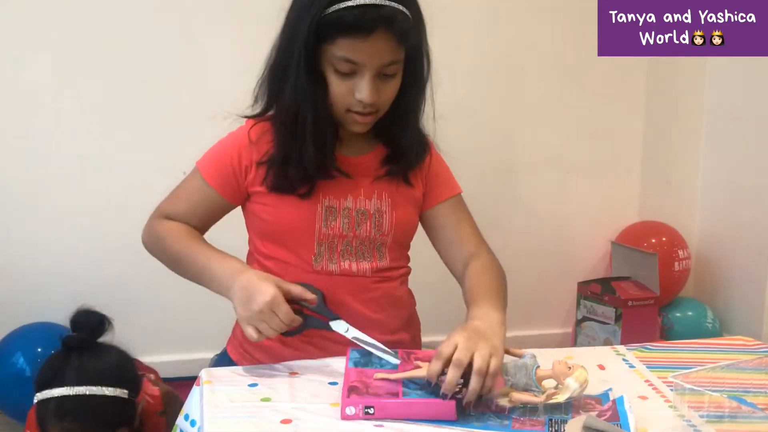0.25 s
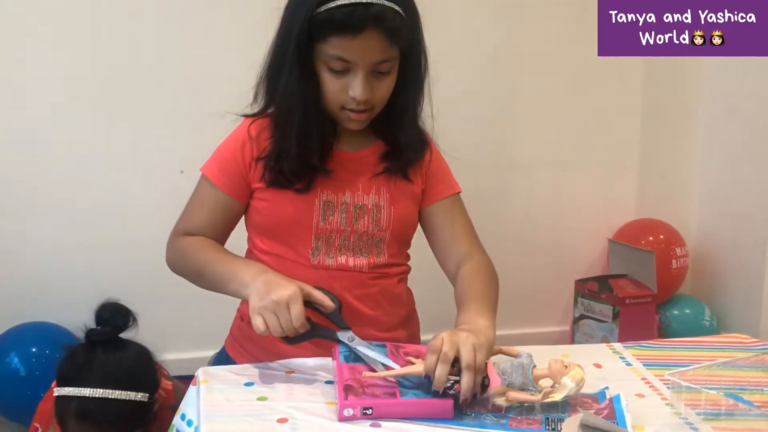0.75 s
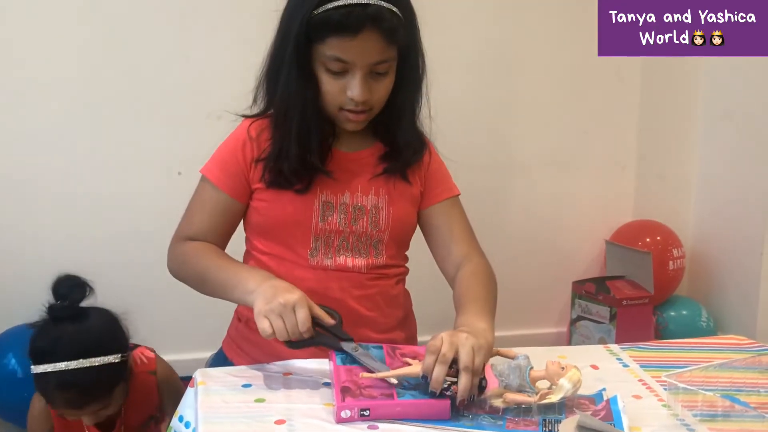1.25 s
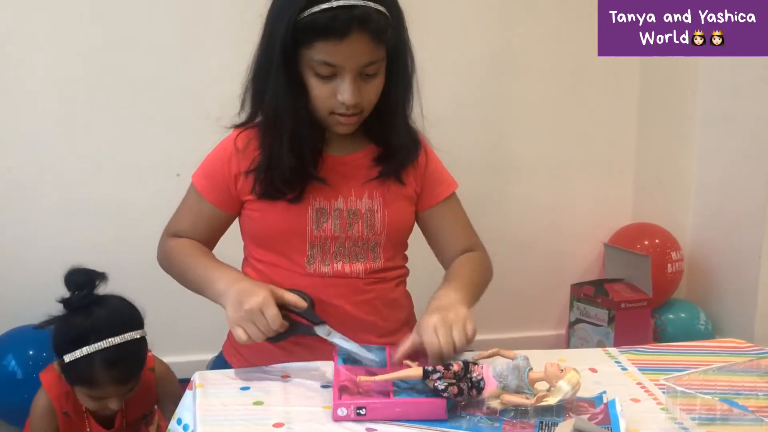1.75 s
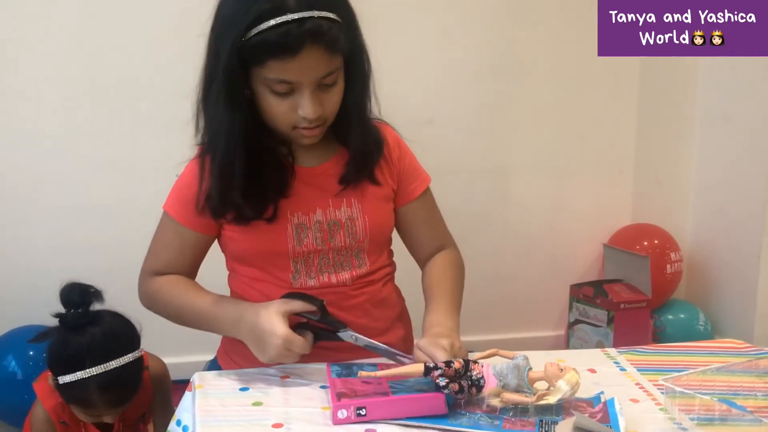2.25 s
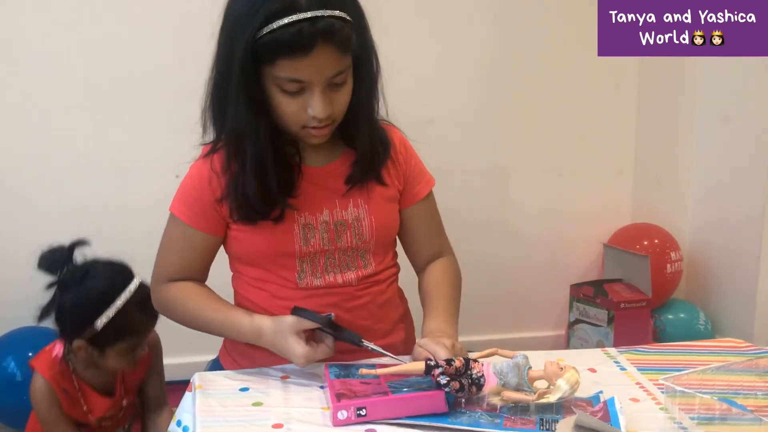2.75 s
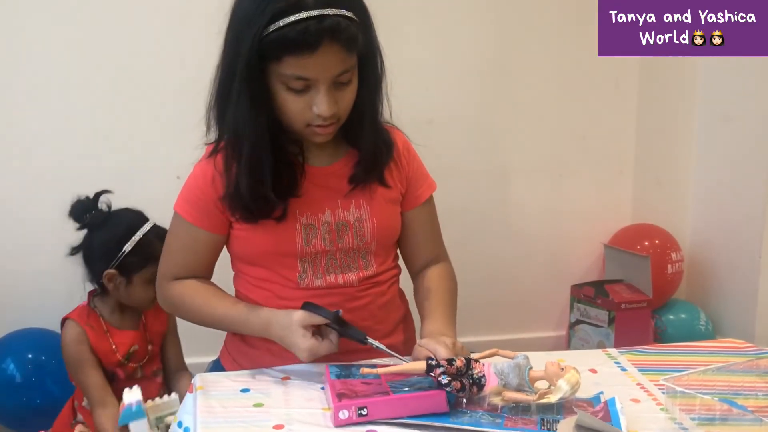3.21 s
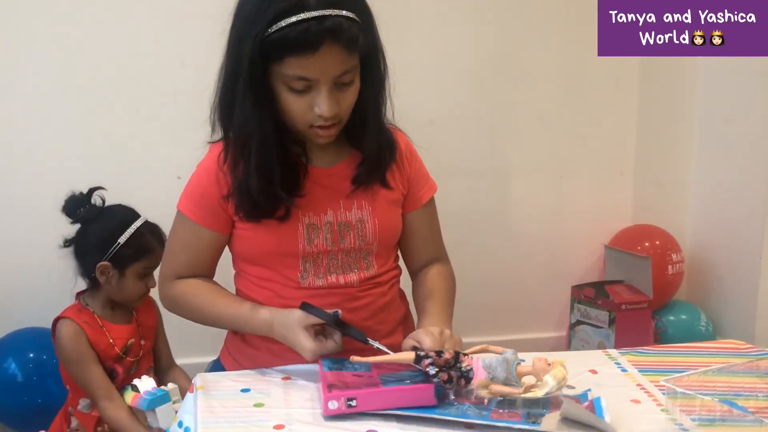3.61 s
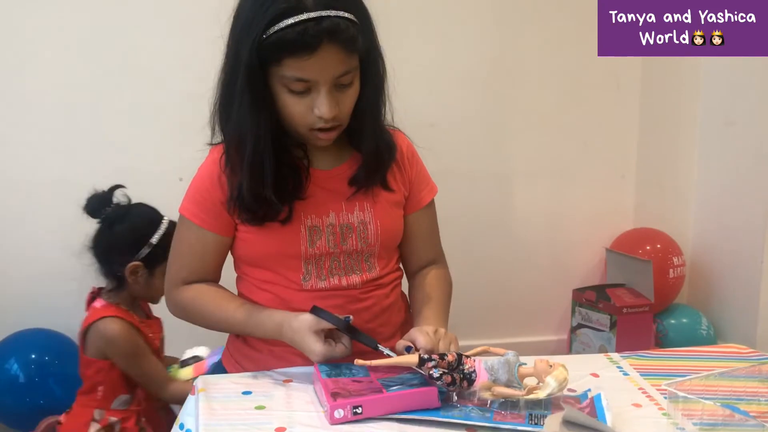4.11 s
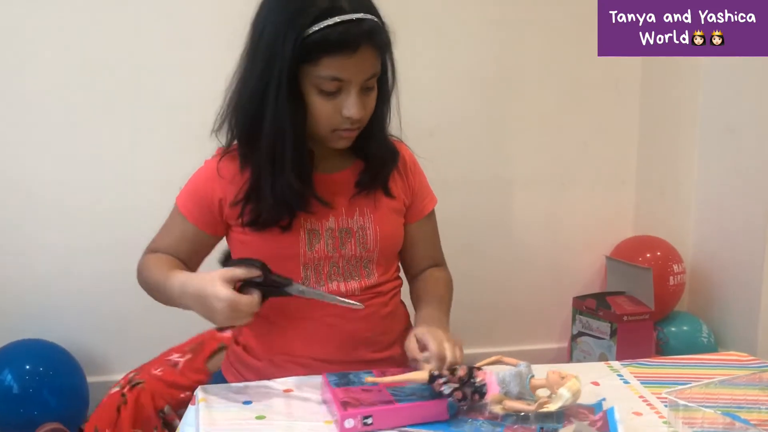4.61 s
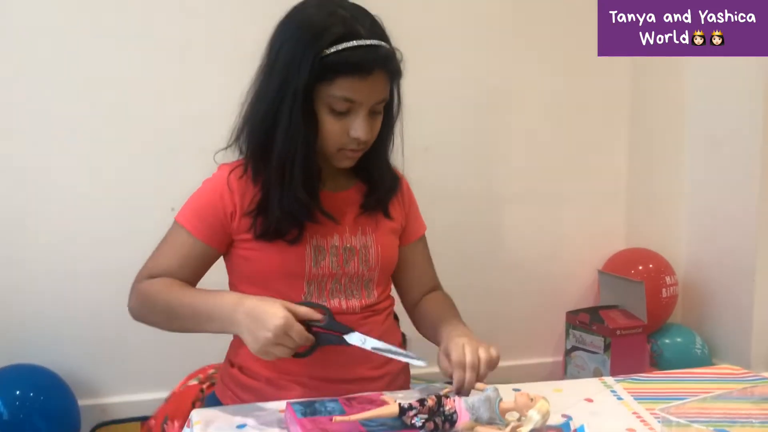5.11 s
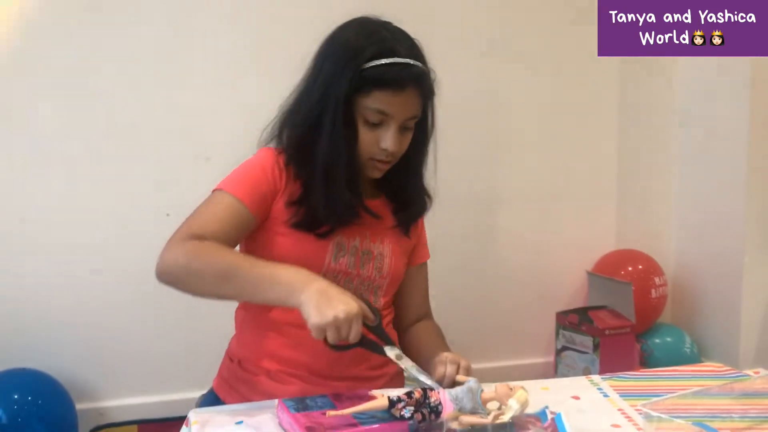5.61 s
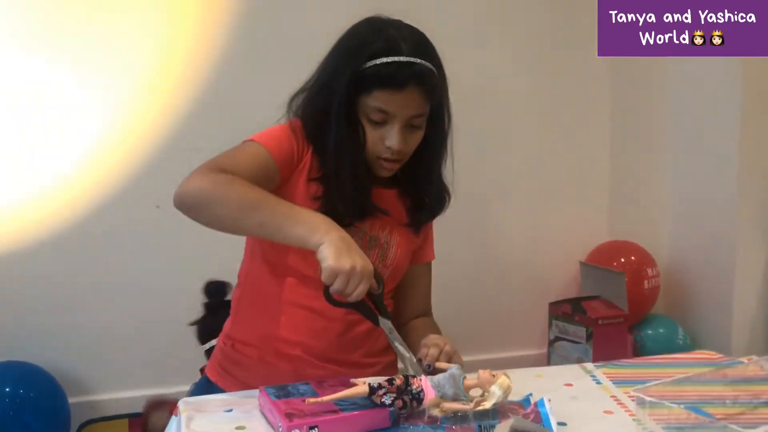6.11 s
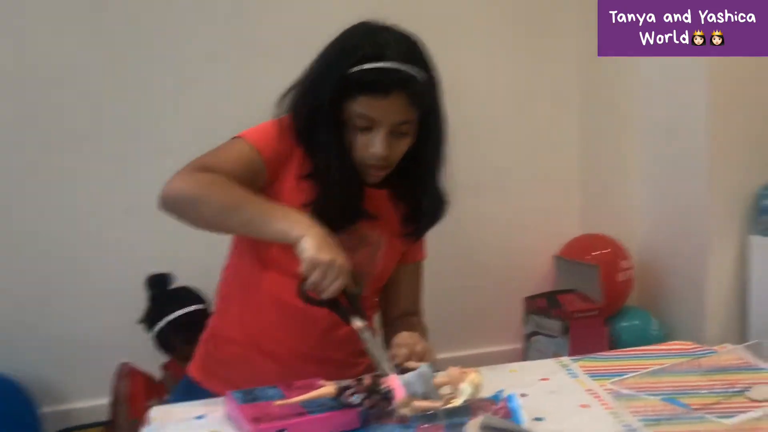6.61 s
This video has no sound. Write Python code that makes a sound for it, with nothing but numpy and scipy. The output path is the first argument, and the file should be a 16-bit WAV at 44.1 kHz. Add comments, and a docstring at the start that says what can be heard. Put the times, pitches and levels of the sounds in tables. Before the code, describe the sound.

Scissors snip at stiff toy packaging with sharp plastic snaps and card rustle, knocks and floor thumps nearby, faint fan hum in a small room.

```python
"""A small bare room: scissors work at the plastic ties of a toy box on a table, a fan humming behind.
Far: steady shaped noise for the air, noise through low resonances for the drone.
Near: card and film rustle and strokes are slipping grains; scrapes and blades ring hard resonances;
thumps on the floor are dying sines; ticks, snapping ties and knocking bricks are noise bursts.
Sparse tails carry the close sounds into the room; the microphone cuts bass and colours the treble."""
import sys
import numpy as np
from scipy import signal
from scipy.io import wavfile
from scipy.ndimage import uniform_filter1d

SR = 44100
rng = np.random.default_rng(int(sys.argv[2]) if len(sys.argv) > 2 else 0)


def int16_out(signal):
    """Quantize to a 16-bit WAV file."""
    q = np.round(np.clip(np.atleast_2d(signal).T, -1, 1) * 32767)
    wavfile.write(sys.argv[1], SR, q.astype(np.int16))


N = 302380

# Air of the room, relative spectrum: f/Hz, density/dB per Hz
AIR_SPECTRUM = [(18, -44), (30, 20.5), (100, -7), (121, -49), (149, -10), (259, -8.5), (740, -28),
                (889, -12), (1460, -66), (1670, -41), (2120, -61), (6050, -33), (10500, -35), (12600, -30),
                (16000, -30)]
AIR_DB, HUM_DB, WAVER_DB = -55, -58.5, 1  # rms level of the air, mid level and rms waver of the fan drone

# Decay of the room: f/Hz, t60/s
ROOM_DECAY = [(250, 0.35), (700, 0.48), (1800, 0.37), (4600, 0.44), (12000, 0.24)]

# Knees and other soft blows on the floor: t/s, blow level/dB, factor on pitch, slap re blow/dB
THUMPS = [(.146, -30, 1.34, -1.5), (0.518, -34, 0.59, -30), (1.301, -36.5, 1.57, -15),
          (2.42, -44.5, 1.8, -31), (3.96, -30.5, 1.5, 3.5), (4.041, -31.5, 1.0, -2),
          (4.142, -19, 0.86, -7.5), (4.165, -22.5, 1.16, -4), (4.191, -26, 1.03, -5),
          (4.664, -9, 1.0, -12.5), (4.698, -25.5, 1.16, -10.5), (4.744, -30, 0.91, -18),
          (5.228, -22, 0.94, -14), (5.879, -35.5, 1.36, -18)]
# Floor boards, before the factor on pitch and the tilt: f/Hz, level/dB, t60/s
FLOOR_MODES = [(69.3, -5, 0.33), (108.4, 4, 0.15), (187.2, -8, 0.36), (253.2, -14, 0.42),
               (292.5, -4.5, 0.15), (373.6, -13, 0.23)]
FLOOR_TILT_DB_PER_OCTAVE = -2.5  # pivots at 100 Hz

# Handling of card and film: t/s, level/dB, brightness/dB per octave
RUSTLE = [(0.05, -56, 3), (0.13, -45, 2), (0.4, -56.5, 0.5), (0.55, -43.5, 2), (0.65, -58, -1),
          (1.18, -64, 0.5), (1.32, -44.5, 4), (1.45, -54.5, 1.5), (1.79, -50.5, 2), (2.23, -55, 2.5),
          (2.31, -65.5, 0), (2.701, -60, 2), (3.47, -61.5, 1), (3.95, -50.5, 0), (4.09, -40.5, 1.5),
          (4.41, -53.5, 2), (4.7, -51, 3), (5.0, -62, 2.5), (5.4, -58.5, -2.5), (5.56, -55.5, 2.5),
          (6.4, -59, 2.5), (6.61, -56.5, 3.5), (6.86, -57, 2.5)]
# Relative spectrum of the rustle at neutral brightness: f/Hz, density/dB per Hz
RUSTLE_SPECTRUM = [(88, -42), (150, 7), (368, -1.5), (414, -9), (439, 0), (1790, -7.5), (2180, -11),
                   (5150, -22), (16000, -34)]
# Fingers and bricks slide over card: t/s, level/dB, f/Hz, rise/s, fall t60/s, broad skirt/dB
STROKES = [(0.051, -41.5, 830, .008, 0.14, -4), (.47, -54, 3470, 0.021, 0.71, -7),
           (1.345, -52, 3100, 0.011, 0.57, -16), (1.599, -49.5, 500, 0.0048, 0.38, 5.5),
           (1.61, -59, 3220, 0.0068, 0.068, 2), (1.84, -49, 1680, 0.018, 0.35, -3),
           (2.078, -52, 1000, 0.028, 0.12, -20), (2.16, -63, 6260, 0.021, 0.11, 4.5),
           (3.425, -56.5, 1710, .015, 0.33, -6), (3.95, -51, 3150, 0.035, 0.24, 11.5),
           (4.606, -42, 1480, 0.019, 0.22, -2), (5.339, -42, 1050, 0.019, 0.37, -1),
           (5.711, -48.5, 884, 0.0084, 0.24, -1), (5.715, -48.5, 1480, .012, 0.38, -11),
           (6.14, -57, 1220, 0.0085, 0.091, -2.5), (6.44, -56.5, 970, 0.022, 1, -9),
           (6.45, -50, 1610, 0.054, 0.49, -0.5)]
PATCHY_DB = 3.0  # rms rise and fall of the film's narrow resonances
# Stiff backing card, resonances added to the handling: f/Hz, width/Hz, level/dB
CARD_MODES = [(1740, 42, -8), (2460, 83, -17), (3400, 750, -8.5), (4370, 100, -24)]

# A hard toy scrapes in two pushes: t/s, pressure/dB, rise/s, fall t60/s
SCRAPE = [(5.222, -33, 0.044, .36), (5.33, -41, 0.03, 0.45)]
# Scraped toy: f/Hz, nominal width/Hz, level at first contact/dB, level on the second push/dB
SCRAPE_MODES = [(941, 22, -19, 8.5), (1610, 250, -22, 5), (2290, 28, -22, 8.5), (2380, 77, -7, 7),
                (4320, 55, -3, 1.5), (5450, 95, -24, -9), (6710, 64, -6, -8), (9400, 470, -22, -11),
                (11000, 290, -14, -11), (13400, 230, -19, -10)]
# Blades slide open in two pulls: t/s, pressure/dB, rise/s, fall t60/s
BLADES = [(5.575, -56, .025, 0.25), (5.61, -68, 0.029, 0.25)]
# Scissor blades: f/Hz, nominal width/Hz, level at first/dB, level later/dB
BLADE_MODES = [(3520, 270, -3, -1), (5160, 120, -6, -5), (8600, 340, -7, -8), (12000, 500, -18, -17)]
SECOND_PUSH_S, BLADE_SHIFT_S = 5.33, 5.63

# Thin ticks of stiff film: t/s, peak level/dB
TICKS = [(0.3654, -41), (1.07, -41.5), (1.1182, -35), (1.2175, -37), (1.248, -22), (1.5259, -50),
         (3.62, -38.5), (3.6717, -39), (3.7294, -51), (4.4394, -57), (4.8198, -35), (4.8366, -36),
         (4.902, -50), (4.923, -44.5), (5.5064, -45), (5.537, -43), (6.2907, -48), (6.4914, -38.5)]
TICK_LOW_HZ = 4800

# Ties snap, blades and bricks knock: t/s, peak level of the main band/dB, main f/Hz,
# then crackle, treble and box ring re that peak/dB, and room share/dB
SNAPS = [(0.0812, -15.5, 1690, -1.5, -5.5, -10, -0.5), (0.1475, -18.5, 1090, -3, 0, -45, 0),
         (0.386, -35.5, 1740, -5.5, -9, -12, -6), (0.408, -29, 1820, -8, -10, -3, -3.5),
         (0.4523, -21.5, 1540, -2, -6, -11.5, -0.5), (0.5866, -34, 1560, -24, -30, -14, 6),
         (0.8582, -39.5, 1690, -7, -25, -4.5, 1), (0.8919, -43.5, 1700, -5.5, -9, 0, -4.5),
         (1.1495, -32.5, 935, 2, 0.5, -1, 1), (1.1999, -35.5, 1670, 3, 13.5, -16, 8.5),
         (1.2067, -22, 2320, -21, 1, -12, -11), (1.2221, -26, 1110, -0.5, 5, -1, 2),
         (1.2236, -25.5, 398, -30, -30, -33, 0.5), (1.2265, -14.5, 1830, -25, 8, -7.5, -7.5),
         (1.2465, -36.5, 990, -16, 3, 14, -7), (1.2992, -29.5, 1610, -26, 1, -8, -8),
         (1.3152, -29, 1790, -21, -32, -3.5, -14), (1.3498, -33.5, 1150, -17.5, -27, -2, 4),
         (1.5992, -24, 2060, -23, -3.5, -17, 1), (1.6897, -27, 1740, -9, -9.5, -7, -1.5),
         (1.7185, -35, 1930, -5, -6, -2, 3), (1.7389, -28, 2220, -4, 0, -30, -1),
         (1.8408, -36, 1520, -14.5, -3, -2, -6), (1.8616, -40.5, 1730, -26, -3, -3, 5.5),
         (1.957, -29.5, 1720, -3.5, -3.5, -27, -35), (1.9785, -30.5, 1850, -27, -4, -33, -20),
         (2.5229, -40, 1190, -11, -13, -5, 0), (3.022, -29, 1920, -23, 12.5, 2, -5),
         (3.3235, -45.5, 1560, -28, -29, -4, -6), (3.4616, -41, 1050, -9, -10, -4, -0.5),
         (3.5078, -28.5, 1410, -4, 6, -3.5, -2), (3.9119, -21.5, 1850, -5.5, -2, -6.5, -5),
         (3.9364, -30, 1350, 8.5, 6.5, -3, 2.5), (3.9434, -18.5, 1870, -1, -16, -10, -1),
         (3.9903, -29, 1240, -8.5, -5, -11.5, 12), (4.1686, -27.5, 1310, -9.5, -7, -16, 6),
         (4.362, -31.5, 1210, -8, -5.5, -23, 4), (4.5212, -40, 2380, -30, 17.5, -4, -9),
         (4.583, -34.5, 1820, -13, -8, -8, 8.5), (4.665, -25, 1300, -7.5, 0.5, -25, 10),
         (5.225, -30, 1200, -9.5, -9, -23, 12.5), (5.4298, -27.5, 2130, -7.5, -30, -16, 6),
         (5.5575, -35.5, 2290, -25, -29, -30, -4), (5.8895, -48, 2930, -9, -8, -5, -1),
         (5.935, -46.5, 1660, -2, -11, -10, 2), (6.0701, -39, 2290, -9, -8.5, -18, 1),
         (6.682, -31, 2110, -15, -26, -7, -6.5)]
# Hollow card box: multiple of its pitch, level/dB, t60/s
BOX_MODES = [(0.43, 0.5, 0.021), (0.928, 3, 0.024), (1, 2, 0.069), (1.058, -6.5, 0.075), (1.9, -4, 0.034)]
# The box's pitch shifts with the place where the hand holds it: t/s, f/Hz
GRIP = [(.6, 957), (.8, 883), (1.16, 859), (1.21, 975.5), (2.6, 1000), (2.95, 898), (3.6, 880), (3.85, 994),
        (5.0, 920), (6.1, 935), (6.6, 654)]
BURST_T60_S, BOX_TO_ROOM_DB = 0.025, 5

# Microphone response: f/Hz, level/dB
MIC_RESPONSE = [(4500, -2.5), (5700, -1.5), (6500, 0), (7500, -3), (9000, -1.5), (10600, -6), (11800, -3),
                (13500, -5), (16000, -9)]
EDGE_HZ = 16000  # upper band limit


def gain_of(db):
    """dB to gain."""
    return 10 ** (np.asarray(db) / 20)


def evened(x):
    """Scales to rms 1."""
    return x / np.sqrt(np.mean(x ** 2) + 1e-20)


def peaked(x):
    """Scales to peak 1."""
    return x / abs(x).max()


def read(points, hz):
    """Reads a spectrum on a log axis."""
    f, value = np.transpose(points)
    return np.interp(np.log(hz + 1), np.log(f + 1), value)


def add(mix, s, sound):
    """Mixes a sound in at time s."""
    part = mix[round(s * SR):][:len(sound)]
    part += sound[:len(part)]


def level(rows):
    """Gain over the whole scene, read from the t/s and level/dB columns."""
    s, db = np.transpose(rows)[:2]
    return gain_of(np.interp(np.arange(N) / SR, s, db, right=-150))


def swell(t, rise, t60):
    """Soft rise, then an even fall in dB."""
    onset = np.sin(np.pi / 2 * np.clip(t / rise, 0, 1)) ** 2
    return onset * gain_of(-60 * np.maximum(t - rise, 0) / t60)


def band(x, lo_hz, hi_hz):
    """Band-pass."""
    edges = [lo_hz, min(hi_hz, SR / 2.1)]
    return signal.sosfilt(signal.butter(N=3, Wn=edges, btype="band", fs=SR, output="sos"), x)


def resonate(x, hz, width):
    """A fixed resonance with a gain of about 1 at its centre."""
    r = np.exp(-np.pi * width / SR)
    return 2 * signal.lfilter([1 - r], [1, -r * np.exp(2j * np.pi * hz / SR)], x).real


def rings(modes, t):
    """Sum of dying sines."""
    return sum(gain_of(db - 60 * t / t60) * np.sin(2 * np.pi * hz * t) for hz, db, t60 in modes)


def grains(per_s, spread_db):
    """Tiny slips of very uneven size over an even hiss."""
    size = gain_of(spread_db * np.minimum(rng.exponential(1, N), 5))
    slips = size * (rng.random(N) < per_s / SR)
    return evened(rng.standard_normal(N) * (1 + uniform_filter1d(slips, size=30) * 12.3))


def coloured(x, db_of, size):
    """Reshapes short-time spectra by a rule db_of(hz, t)."""
    hz, t, z = signal.stft(x, SR, nperseg=size)
    return signal.istft(z * gain_of(db_of(hz[:, None], t)), SR, nperseg=size)[1][:x.shape[-1]]


def air():
    """Steady room noise, and the drone of a fan as resonant noise whose level wavers slowly."""
    hiss = coloured(rng.standard_normal(N), lambda hz, t: read(AIR_SPECTRUM, hz) + 0 * t, size=2048)
    drone = resonate(resonate(rng.standard_normal(N), 100.7, 16.0), 96.0, 21.3)
    waver = evened(uniform_filter1d(rng.standard_normal(N), size=SR // 3))
    return gain_of(AIR_DB) * evened(hiss) + gain_of(HUM_DB + WAVER_DB * waver) * evened(drone)


def room(x):
    """Three sparse tails taken in turn, each band dying at its own speed."""
    out, t = np.zeros(N), np.arange(N) / SR
    for k in range(3):
        taps = np.zeros(SR // 2)
        at = np.arange(300, len(taps) - 20, 20)  # one reflection per slot of 20 samples
        taps[at + rng.integers(0, 20, len(at))] = rng.choice([-1., 1.], len(at))
        tail = coloured(taps, lambda hz, s: -60 * s / read(ROOM_DECAY, hz), size=256)
        turn = np.sqrt(2 / 3) * np.cos(np.pi * (3 * t + k / 3))  # squares of the three sum to 1
        out += signal.oaconvolve(x * turn, tail / np.linalg.norm(tail))[:N]
    return out


def thumps():
    """Soft blows ring the floor boards; a dull slap goes with each."""
    out, t = np.zeros(N), np.arange(SR // 2) / SR
    noise = rng.standard_normal((len(THUMPS), len(t)))
    for (s, db, size, slap_db), z in zip(THUMPS, noise):
        modes = [(hz * size, g + FLOOR_TILT_DB_PER_OCTAVE * np.log2(hz / 100), t60)
                 for hz, g, t60 in FLOOR_MODES]
        slap = band(z * gain_of(-60 * t / 0.22), 144.0, 800.0)
        blow = peaked(rings(modes, t)) + gain_of(slap_db) * peaked(slap)
        add(out, s - .002, gain_of(db) * blow * np.minimum(t / 0.0029, 1))
    return out


def rustle():
    """Clumped crackle of card and film, brighter or duller with the way it is handled."""
    s, _, bright_db = np.transpose(RUSTLE)

    def tone(hz, t):
        tilt = np.interp(t, s, bright_db) * np.log2((hz + 50) / 1500)
        return read(RUSTLE_SPECTRUM, hz) + tilt
    return level(RUSTLE) * evened(coloured(grains(350., 3.65), tone, size=256))


def strokes():
    """Short slides that swell and fade, centred on a pitch with a broad skirt."""
    out, t, drive = np.zeros(N), np.arange(SR // 2) / SR, grains(1200., 1.4)
    for s, db, hz, rise, t60, broad_db in STROKES:
        z = drive[round(s * SR):][:len(t)]
        core = evened(band(z, hz / 1.265, hz * 1.168))
        skirt = evened(resonate(band(z, 350.0, 9900.0), hz, 2200.0))
        tone = core + gain_of(broad_db) * skirt
        add(out, s, gain_of(db) * tone * swell(t[:len(z)], rise, t60))
    return out


def crumpled(x):
    """Narrow resonances come and go at random as the film bends."""
    def patches(hz, t):
        z = rng.standard_normal((len(hz), len(t)))
        smooth = uniform_filter1d(uniform_filter1d(z, size=2, axis=0), size=14, axis=1)
        return PATCHY_DB * evened(smooth)
    return coloured(x, patches, size=512)


def card(x):
    """The backing card adds its resonances."""
    return x + sum(gain_of(db) * resonate(x, hz, width) for hz, width, db in CARD_MODES)


def rub(rows, modes, shift_s, rasp_db):
    """Rubbing rings a hard object over a broad rasp; the balance moves as the contact shifts."""
    t, drive = np.arange(N) / SR, grains(620.0, 2.6)
    later = np.clip((t - shift_s) / 0.036 + .5, 0, 1)  # 0 before the shift, 1 after
    tones = 0
    for hz, w, first_db, later_db in modes:
        ring = evened(resonate(resonate(drive, hz, 1.8 * w), hz, 6 * w))
        tones = tones + gain_of(first_db + (later_db - first_db) * later) * ring
    rasp = evened(signal.lfilter([1], [1, -.8], band(drive, 450.0, 15000.0)))
    pressure = sum(gain_of(db) * swell(t - s, rise, t60) for s, db, rise, t60 in rows)
    return pressure * (evened(tones) + gain_of(rasp_db) * rasp)


def ticks():
    """Dry flicks of a few milliseconds, treble only."""
    out, t = np.zeros(N), np.arange(500) / SR
    for (s, db), z in zip(TICKS, rng.standard_normal((len(TICKS), len(t)))):
        flick = band(z * gain_of(-60 * t / 0.016), TICK_LOW_HZ, 19000.0)
        add(out, s - .0005, gain_of(db) * peaked(flick))
    return out


def snaps():
    """A pitched crack, a crackle and a fizz, which also ring the box; returns direct sound and room feed."""
    near, far, t = np.zeros(N), np.zeros(N), np.arange(6000) / SR
    noise, spike = rng.standard_normal((len(SNAPS), len(t))), 1. * (t == 0)
    for (s, db, hz, crackle_db, treble_db, box_db, wet_db), z in zip(SNAPS, noise):
        burst = z * (1 - np.exp(-t / 0.001)) * gain_of(-60 * t / BURST_T60_S)
        fast = z * (1 - np.exp(-t / 0.0002)) * gain_of(-60 * t / .008)  # treble starts and dies first
        parts = [(0, burst, hz / 1.388, hz * 1.424),
                 (crackle_db, burst, 2400., 4800.),
                 (treble_db, fast, 4900., 18000.)]
        for part_db, drive, lo_hz, hi_hz in parts:
            part = gain_of(db + part_db) * peaked(band(drive, lo_hz, hi_hz))
            add(near, s - .001, part)
            # the room is fed a single click through the same band, with the energy of the part
            even = band(spike, lo_hz, hi_hz)
            add(far, s, gain_of(wet_db) * even * np.linalg.norm(part) / np.linalg.norm(even))
        pitch = np.interp(s, *np.transpose(GRIP))
        box = rings([(k * pitch, g, t60) for k, g, t60 in BOX_MODES], t)
        ring = gain_of(db + box_db) * peaked(box * (1 - np.exp(-t / 0.0012)))
        add(near, s - .001, ring)
        add(far, s, gain_of(wet_db + BOX_TO_ROOM_DB) * ring)
    return near, far


def scene():
    """All sources, direct and through the room."""
    near, far = snaps()
    scrape = rub(SCRAPE, SCRAPE_MODES, SECOND_PUSH_S, rasp_db=-1.4)
    blades = rub(BLADES, BLADE_MODES, BLADE_SHIFT_S, rasp_db=-16.0)
    handling = card(crumpled(rustle() + strokes())) + scrape + blades + ticks()
    low = thumps()
    wet = room(gain_of(-4.5) * card(far) + gain_of(-10.5) * handling + gain_of(-9.0) * low)
    return (card(near) + handling + low + wet + air())[None]


def record(dry):
    """Bass cut and microphone colour, then the band limit."""
    cut = signal.sosfilt(signal.butter(N=5, Wn=58., btype="high", fs=SR, output="sos"), dry[0])
    heard = coloured(cut, lambda hz, t: read(MIC_RESPONSE, hz) + 0 * t, size=512)[None]
    limit = signal.firwin(511, EDGE_HZ, window=("kaiser", 9), fs=SR)[None]
    return signal.oaconvolve(heard, limit, "same")


dry = scene()
out = record(dry)
int16_out(out)
```